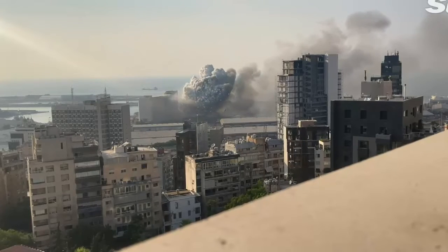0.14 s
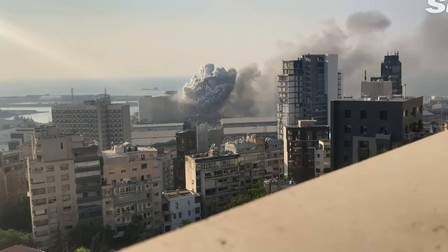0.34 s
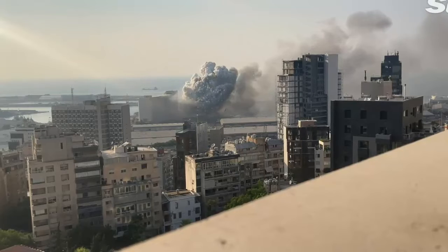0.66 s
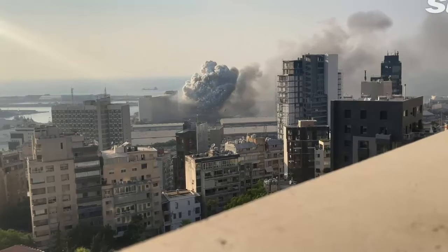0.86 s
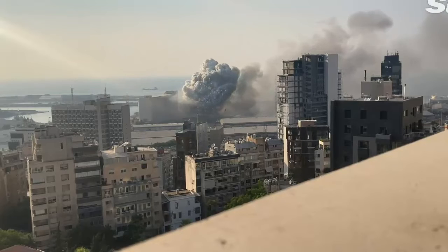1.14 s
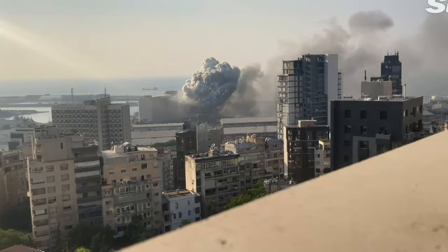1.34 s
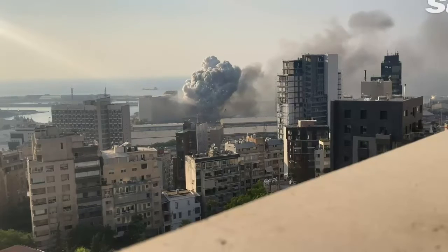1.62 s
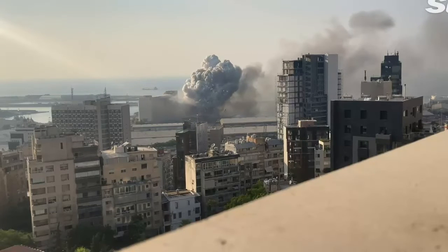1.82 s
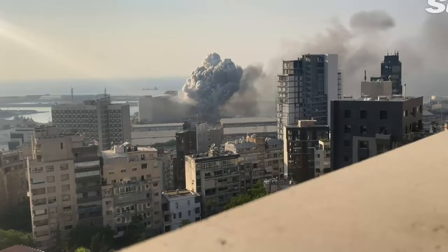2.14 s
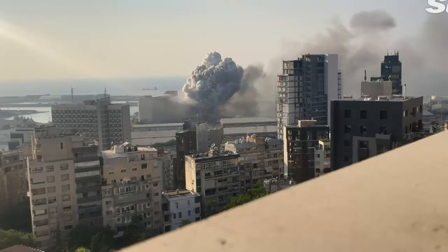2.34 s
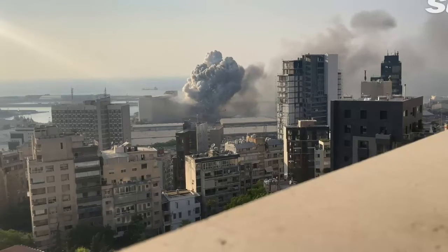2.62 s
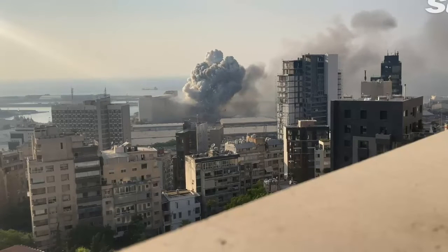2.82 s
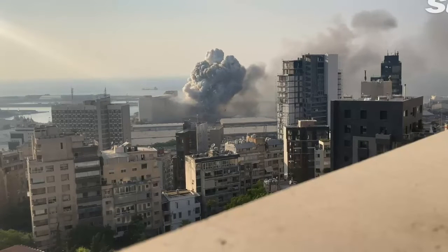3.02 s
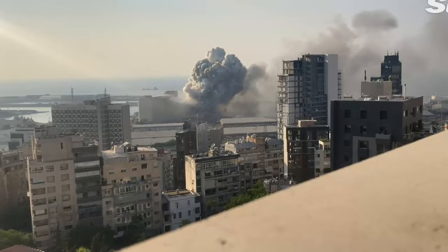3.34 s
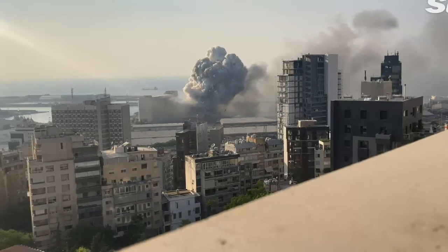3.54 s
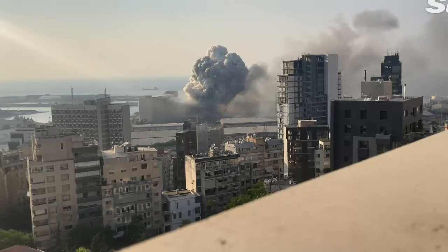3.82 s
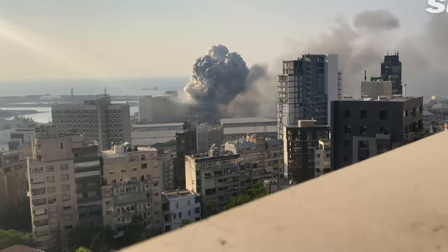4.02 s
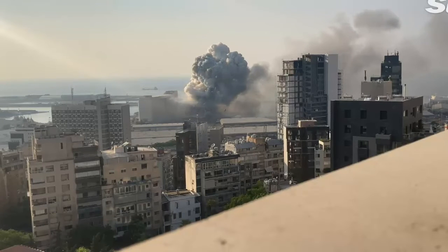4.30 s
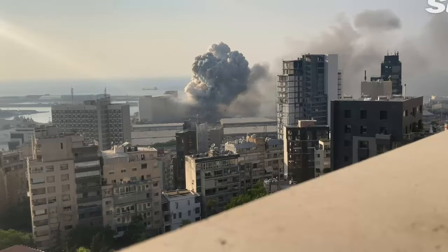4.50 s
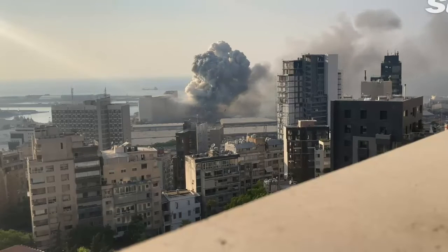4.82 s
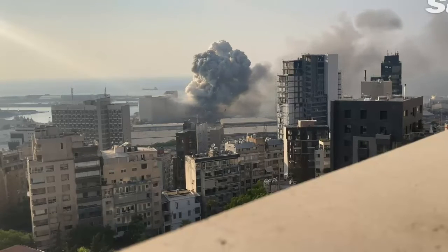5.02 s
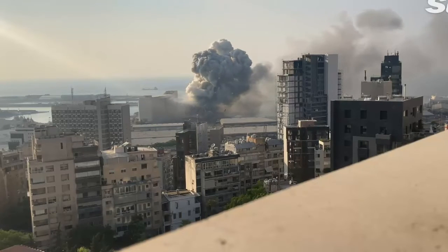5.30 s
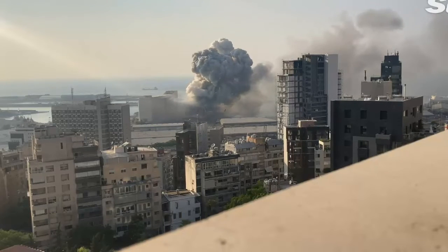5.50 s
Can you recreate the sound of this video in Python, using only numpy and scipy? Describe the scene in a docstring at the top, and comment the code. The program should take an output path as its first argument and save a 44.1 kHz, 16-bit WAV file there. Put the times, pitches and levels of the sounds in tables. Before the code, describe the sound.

A big explosive fire is heard from far away over a city, already roaring at 0 s. The sound is mostly low and low-mid, thick and dulled by distance, a rough noise that rolls and flutters as countless small blasts merge. It is loudest at the start, with gritty ticks near 0.25 s, and sinks unevenly until about 4 s, getting darker and bassier. Muffled thuds punctuate it, around 0.6, 0.9, 2.0, 2.3, 2.5, 3.0, 3.4 and 4.2 s, each a dull push with a soft rustle and brief echoes off buildings. Thin, clear cracks stand out at about 2.0 and 2.3 s; other treble flecks are fainter. From 4.3 s the roar brightens, then swells moderately, with strong thuds at 4.7 and crowding at 4.9-5.2 s, continuing to the cut at about 5.6 s. Stereo leans left, the right duller and slightly late; peaks are limited, over faint steady hiss.

```python
"""A large fire explodes far away across a city: noise lifted by random small blasts, dulled by the air.
The roar opens loud and sinks for four seconds; dull reports, each a pulse with a rustle and echoes, stand out.
Brief treble noise bursts come with it, a few of them (1.99, 2.28 s) clear cracks; then the roar swells again,
brighter, the reports crowding. Two microphone ports hear it from the left, the right one late and shadowed;
a limiter holds the loudest peaks over a faint steady hiss."""
import sys
import numpy as np
from scipy import signal
from scipy.fft import rfft, irfft, next_fast_len
from scipy.io import wavfile
from scipy.ndimage import uniform_filter1d, minimum_filter1d, map_coordinates

SR = 44100
rng = np.random.default_rng(int(sys.argv[2]) if len(sys.argv) > 2 else 0)


def master_out(mix):
    """Clip the mix to full scale and print it as 16-bit PCM to the path in sys.argv[1]."""
    frames = np.transpose(np.atleast_2d(mix))
    ceiling = np.clip(frames, -1, 1)
    pcm = np.round(ceiling * 32767).astype(np.int16)
    wavfile.write(sys.argv[1], SR, pcm)


N = 249606

# colour of a far blast after its way through the air: frequency_hz, level_db (per Hz, relative)
FAR_AIR = [(15, -51), (45, -17.5), (70, -6.5), (140, 1), (190, 0.5), (250, -2.5), (330, -2), (420, -1.66),
           (480, -4), (560, -4), (700, -10), (900, -14.5), (1650, -26.5), (2500, -36.5), (3300, -47),
           (3900, -51.5), (4500, -55), (4950, -60.5), (5400, -63.5), (7000, -72.5), (9000, -80),
           (11500, -86)]


def roar():
    """Two unrelated blast streams: what both ports share, and what reaches the right one by other streets."""
    # deep bass under 110 Hz against the rest: time_s, level_db
    deep_bass = [(0, -1), (1.2, -0.5), (2.7, -0.5), (3.299, 3), (4.3, 1.5), (4.9, -1), (5.66, -2.2)]
    bright_per_db, sizzle_per_db = 0.48, .85  # treble dB, and dB above 4.8 kHz, per roar dB
    plain_at_db = -17.5  # roar level of plain colour
    flare_start_s, flare_rise_s, flare_lift_db = 4.3, .3, 2  # the late swell sounds brighter
    t = np.arange(N) / SR
    level_db = burning_db(t)
    louder_db = level_db - plain_at_db

    streams = np.array([blasts(25, 7.7, 0.0052), blasts(27, 1.2, 0.0073)])
    dulled = unit(signal.fftconvolve(streams, pulse(FAR_AIR)[None], axes=1)[:, :N])

    # louder burning is brighter
    flare_db = flare_lift_db * np.clip((t - flare_start_s) / flare_rise_s, 0, 1)
    bright = brightened(dulled, bright_per_db * louder_db + flare_db, corner_hz=1230, order=2)
    # the band above 2.5 kHz tears unevenly
    torn = brightened(bright, 1 * wobble(30), corner_hz=2500, order=4)
    # the top also comes in irregular gritty bursts
    sizzle_db = sizzle_per_db * louder_db + 2.2 * wobble(35)
    # lift everything, then take the lift back above the bass
    deep_db = np.interp(t, *np.transpose(deep_bass))
    deepened = amp(deep_db) * brightened(torn, -deep_db, corner_hz=110, order=4)
    # the whole roar rolls unevenly
    rolling = amp(level_db + .45 * wobble(7))
    return rolling * brightened(deepened, sizzle_db, corner_hz=4800, order=6)


def burning_db(s):
    """Strength of the burning: the roar level at these times, before its colour changes."""
    # time_s, level_db
    strength = [(0, -12.5), (.55, -14.5), (.7, -15.5), (1.0, -16.5), (1.3, -16.5), (1.6, -17.5), (1.9, -19),
                (2.15, -20), (2.35, -22), (2.6, -22.5), (3.1, -23.5), (3.6, -24.5), (4.0, -26),
                (4.2, -24.5), (4.4, -25.5), (4.65, -26.5), (4.9, -25), (5.15, -24), (5.4, -25),
                (5.66, -24.5)]
    return np.interp(s, *np.transpose(strength))


def blasts(per_second, spread_db, smear_s):
    """Countless small blasts merge into noise; bigger ones, smeared by the long path, lift it for a moment."""
    size_db = np.minimum(spread_db * rng.exponential(size=N), 9)
    sizes = (rng.random(N) < per_second / SR) * amp(size_db)
    t = np.arange(2000) / SR
    smear = t / smear_s * np.exp(1 - t / smear_s)
    lift = signal.fftconvolve(sizes, smear)[:N]
    noise = (1 + .07 * lift) * rng.standard_normal(N)
    # patches of time and pitch differ a little in level
    z = signal.stft(noise, nperseg=1024)[2]
    over_pitch = uniform_filter1d(rng.standard_normal(z.shape), size=3, axis=0)
    patches = uniform_filter1d(over_pitch, size=5, axis=1)
    return signal.istft(z * amp(1.3 * unit(patches)), nperseg=1024)[1][:N]


def reports():
    """Each report is one dull push of pressure and a smeared rustle, then echoes."""
    # single reports: start_s, thump_peak_db (over the roar level)
    report_list = [(0.158, -3), (0.385, 0), (0.593, 5.5), (0.864, 3), (1.991, 5.5), (2.265, 4),
                   (2.536, 7.5), (2.973, 3), (3.429, 6), (3.825, -0.5), (4.194, 7.5), (4.704, 9.5),
                   (4.944, 4.5), (5.033, 7), (5.114, 8), (5.126, 4.5), (5.195, 5), (5.332, 0), (5.573, 4.5)]
    # the smeared middle of a report: frequency_hz, level_db (per Hz, relative)
    rustle_colour = [(300, -19), (900, 2), (1650, -2.5), (2400, -16.5), (3400, -28), (5200, -38),
                     (8000, -54)]
    s, over_db = np.transpose(report_list)
    starts = np.round(s * SR).astype(int)
    thump_db = burning_db(s) + over_db
    pushes = np.zeros(N)
    pushes[starts] = -amp(thump_db)
    thumps = signal.fftconvolve(pushes, pulse(FAR_AIR))[:N]
    # the rustle's level in dB is set against its thump
    rustles = bursts(starts, thump_db - 27, [rustle_colour] * len(s), rise_s=0.0035)
    direct = thumps + rustles
    shared = direct + amp(-3.0) * echoes(direct)
    other = amp(3.5) * echoes(direct)
    return np.array([shared, other])


def treble_bursts():
    """Brief treble noise with a softer trail, the body louder on the left, in a faint halo of echoes."""
    # brief treble bursts, those at 1.99 and 2.28 s clear cracks:
    # start_s, level_db, top_db (against the body), top_centre_hz
    burst_list = [(0.2469, -55, 7, 6600), (0.2515, -58, 6, 7200), (0.7864, -66, 6, 7300),
                  (0.8654, -68, 7, 7800), (0.9391, -69, 13, 8200), (1.095, -62, 4, 7200),
                  (1.185, -74, 10, 6500), (1.9041, -65, -2, 6000), (1.9923, -54, -6, 6300),
                  (2.2752, -49, -5, 6800), (2.3122, -58, -8, 5800), (2.534, -63, -5, 6200),
                  (2.83, -62, -12, 5800), (3.34, -66, -2, 5700), (3.6354, -64, -4, 6300),
                  (3.93, -68, -11, 5600), (4.1936, -72, -2, 5700), (4.7037, -70, 1, 5900),
                  (4.9416, -67, -6, 5900), (5.032, -62, -8, 5600), (5.1102, -65, 1, 5900),
                  (5.195, -70, -6, 5800)]
    # body of a burst: frequency_hz, level_db (per Hz, relative)
    body_colour = [(2500, -30), (3100, -8), (3500, 6), (4200, 2), (5000, -8), (5600, -30)]
    # thin top of a burst: multiple of its centre, level_db (per Hz, relative)
    top_colour = [(.7, -30), (.85, -4), (1, 0), (1.15, -4), (1.4, -16), (1.9, -30)]
    s, level_db, top_db, top_hz = np.transpose(burst_list)
    starts = np.round(s * SR).astype(int)

    def with_trail(db, colours):
        """A sharp burst and the softer, slower one that trails it."""
        sharp = bursts(starts, db, colours, rise_s=.0011)
        trail = bursts(starts, db - 13.5, colours, rise_s=0.007)
        return sharp + trail

    body = with_trail(level_db, [body_colour] * len(s))
    top = with_trail(level_db + top_db, [np.multiply(top_colour, [hz, 1]) for hz in top_hz])
    halo = amp(-11.5) * np.array([echoes(body + top), echoes(body + top)])
    # levels at the left and right port, dB
    return body * amp([[0], [-6]]) + top * amp([[-6], [-8]]) + halo


def bursts(starts, levels_db, spectra, rise_s):
    """Short coloured noise bursts that swell for rise_s and die; each holds the energy its level gives."""
    out, t = np.zeros(N + 6000), np.arange(3000) / SR
    swell = t / rise_s * np.exp(1 - t / rise_s)
    for start, db, spectrum in zip(starts, levels_db, spectra):
        burst = signal.fftconvolve(swell * rng.standard_normal(3000), pulse(spectrum)[:3001])
        out[start:start + 6000] += amp(db) * burst * np.linalg.norm(swell) / np.linalg.norm(burst)
    return out[:N]


def echoes(x):
    """Echoes off the buildings: a scattered tail of energy 1; each frequency dies at its own speed."""
    # frequency_hz, t60_s (time to fall 60 dB)
    city = [(150, 0.25), (1000, 0.14), (6000, 0.065)]
    hz, t, z = signal.stft(rng.standard_normal(SR // 2), SR, nperseg=256)
    decay = amp(-60 * t / along(city, hz)[:, None])
    tail = signal.istft(z * decay, SR, nperseg=256)[1]
    return signal.fftconvolve(x, tail / np.linalg.norm(tail))[:N]


def ports(shared, other):
    """The housing shades and delays the right port, which also hears its own share of scattered sound."""
    # right port against left: frequency_hz, level_db, likeness (0-1), lag_radians
    right_port = [(30, 0, .78, .2), (70, -2, .86, .6), (140, -4, .94, .9), (200, -2.3, .86, .75),
                  (300, -2.7, .85, 1), (400, -5, .83, 1.2), (520, -8, .7, 2.3), (600, -10, .6, 2.9),
                  (690, -9, .48, 3.9), (780, -10, .55, 4.2), (900, -9, .74, 4.5), (1200, -10.5, .58, 5.2),
                  (1650, -12, .35, 4.5), (2100, -12, .62, 3.6), (2900, -9, .3, 3.0), (3400, -5, .45, 5.2),
                  (3900, -3, .65, 6.3), (4500, -8, .33, 6.8), (4900, -5, .4, 7.2), (5200, -4, .55, 9.2),
                  (6000, -2, .5, 8.3), (7000, 0, .9, 6.3)]

    def alike(hz):
        return np.clip(along(right_port, hz, column=2), 0, 1)

    def shade(hz):
        return amp(along(right_port, hz))

    def late(hz):
        return np.exp(-1j * along(right_port, hz, column=3))

    right = filtered(shared, lambda hz: shade(hz) * alike(hz) * late(hz))
    right += filtered(other, lambda hz: shade(hz) * np.sqrt(1 - alike(hz) ** 2))
    return np.array([shared, right])


def amp(db):
    """Gain of a level in dB."""
    return 10 ** (np.asarray(db) / 20)


def unit(x):
    """Scaled to rms 1."""
    return x / np.sqrt(np.mean(x ** 2) + 1e-20)


def along(points, hz, column=1):
    """One column of a table that starts with frequency_hz, read on a log axis."""
    table = np.transpose(points)
    return np.interp(np.log(hz + 1), np.log(table[0] + 1), table[column])


def filtered(x, response):
    """x times a complex response of frequency."""
    m = next_fast_len(N + SR // 2)
    return irfft(rfft(x, m) * response(np.fft.rfftfreq(m, 1 / SR)), m)[..., :N]


def pulse(spectrum, size=8192):
    """The shortest causal (minimum-phase) pulse with this spectrum, peak 1."""
    level_db = along(spectrum, np.fft.rfftfreq(size, 1 / SR))
    cepstrum = irfft(np.log(amp(level_db)), size)
    # fold the cepstrum onto positive time
    cepstrum[1:size // 2] *= 2
    cepstrum[size // 2 + 1:] = 0
    shape = irfft(np.exp(rfft(cepstrum)), size)
    return shape / np.abs(shape).max()


def brightened(x, treble_db, corner_hz, order):
    """x with everything above the corner lifted by a level that moves in time."""
    treble = filtered(x, lambda hz: hz ** order / (hz ** order + corner_hz ** order))
    return x + (amp(treble_db) - 1) * treble


def wobble(rate):
    """A smooth random curve, rate knots a second."""
    knots = rng.standard_normal(int(N * rate / SR) + 4)
    return map_coordinates(knots, [np.arange(N) * rate / SR])


def scene():
    """Roar and reports through the two ports, and the treble bursts."""
    return ports(*(roar() + reports())) + treble_bursts()


def record(dry):
    """A fast limiter on both channels, a faint steady hiss, then the band limit."""
    ceiling_db, hiss_db, top_hz = -4.2, -82.5, 11900
    loudest = np.abs(dry).max(axis=0)
    needed = np.minimum(1, amp(ceiling_db) / (loudest + 1e-9))
    # hold the lowest gain around each peak, then smooth it
    gain = uniform_filter1d(minimum_filter1d(needed, size=128), size=128)
    hiss = amp(hiss_db) * rng.standard_normal(N)  # the same in both channels
    return filtered(dry * gain + hiss, lambda hz: hz < top_hz)


dry = scene()
out = record(dry)
master_out(out)
```